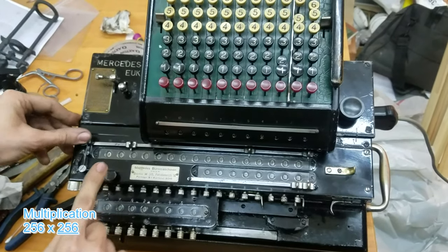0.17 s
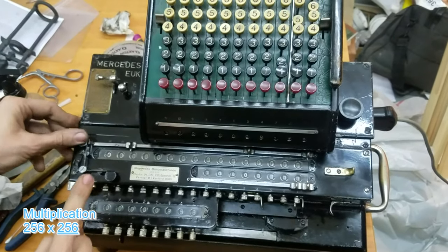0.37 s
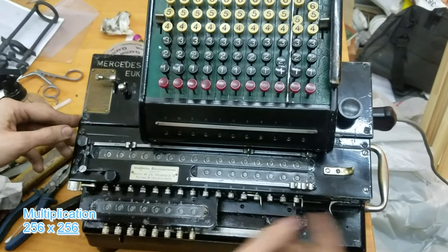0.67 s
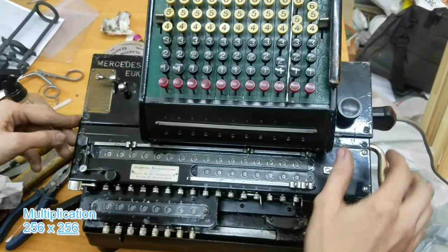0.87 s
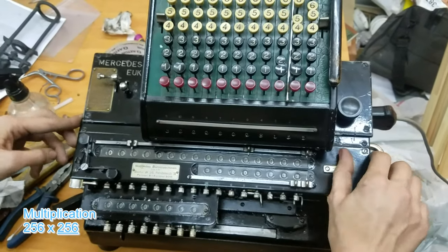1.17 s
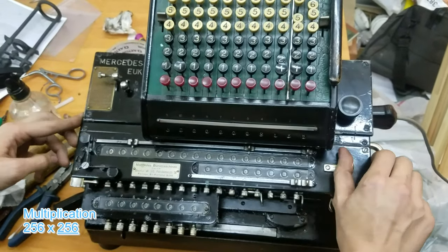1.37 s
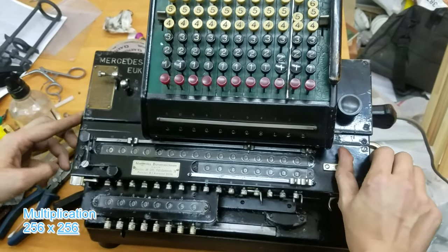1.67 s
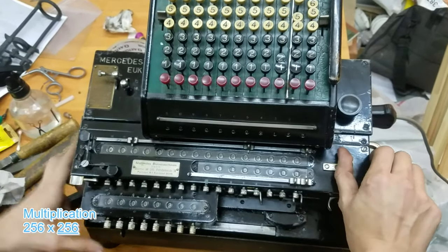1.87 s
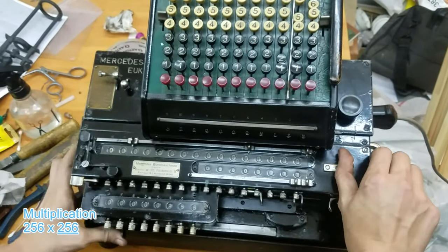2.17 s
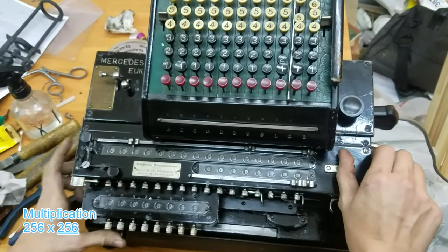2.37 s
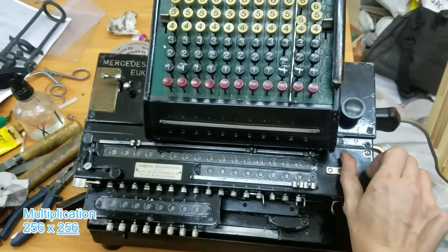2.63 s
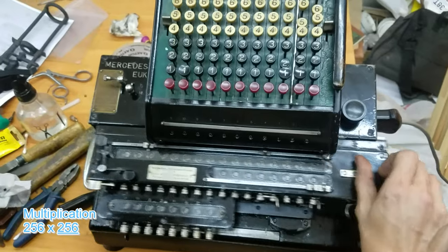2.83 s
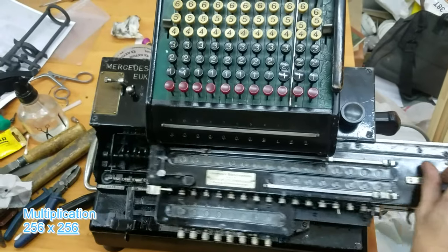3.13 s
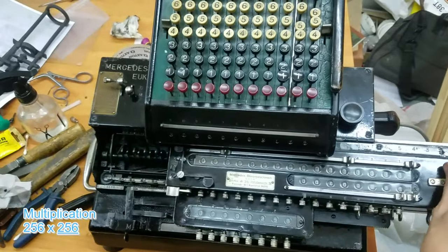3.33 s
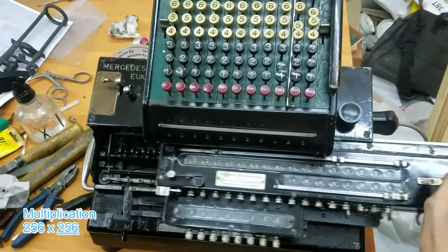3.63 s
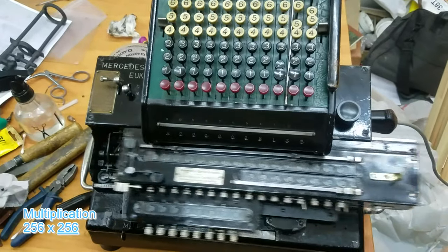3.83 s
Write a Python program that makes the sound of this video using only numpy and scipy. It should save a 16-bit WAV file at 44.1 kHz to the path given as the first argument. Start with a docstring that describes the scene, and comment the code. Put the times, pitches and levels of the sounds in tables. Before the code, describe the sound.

A mechanical calculator's carriage ratchets loudly along its rack, thuds, then rattles back and slams home.

```python
"""Light lever clicks and a hand brushing the case: an old mechanical calculator, close up in a small room.
A latch springs, the carriage is pulled along its rack with a pawl snapping over the teeth, and it thuds
into the end stop. Then it runs back with a growing rattle of gears and slams home.
Contacts are quickly dying noise, steel parts are fading sine tones, and sliding and brushing are
noise made uneven by tiny contacts. Dull room noise and a wavering hum lie underneath."""
import sys
import numpy as np
from scipy import signal
from scipy.fft import rfft, irfft, next_fast_len
from scipy.io import wavfile
from scipy.ndimage import uniform_filter1d, map_coordinates

SR = 44100
rng = np.random.default_rng(int(sys.argv[2]) if len(sys.argv) > 2 else 0)


def store_pcm(level_fs):
    """Save levels as 16-bit WAV."""
    pcm = np.round(np.clip(level_fs, -1, 1) * 32767).astype(np.int16)
    wavfile.write(sys.argv[1], SR, np.atleast_2d(pcm).T)


N = 176400  # samples, 4 s


# The pawl drops into the rack, one row a tooth: (time [s], level [dB])
PAWL_SNAPS = [(2.8, -12.5), (2.8295, -12), (2.832, -10.5), (2.852, -15.5), (2.8687, -14), (2.8833, -14),
              (2.8984, -17), (2.9107, -11), (2.9147, -10.5), (2.9235, -13), (2.9354, -15), (2.9458, -12.5),
              (2.957, -10.5), (2.9675, -12), (2.9778, -11), (2.9869, -11.5), (2.998, -10), (3.008, -13),
              (3.0184, -11.5), (3.03, -12.5), (3.043, -10), (3.05, -11), (3.0608, -12.5), (3.0719, -13.5),
              (3.0825, -13.5), (3.0948, -14), (3.1041, -13), (3.1076, -10), (3.118, -14), (3.1314, -13.5),
              (3.147, -16), (3.1619, -10), (3.1773, -13), (3.1946, -13.5), (3.2133, -15.5), (3.2356, -14),
              (3.26, -12.5), (3.2843, -11), (3.3059, -10.5), (3.3283, -14), (3.351, -11.5)]
# Tone colour of the snap: (frequency [Hz], level [dB])
PAWL_COLOUR = [(150, -17), (900, -9.5), (1600, 1.5), (2300, -4.5), (4500, -1), (7100, 2.5), (9000, -1),
               (12500, 1), (15500, 0.5)]
# Ringing tones of the pawl: (frequency [Hz], level [dB], time to fall 60 dB [s])
PAWL_MODES = [(1532, -6, 0.026), (4870, 2.5, 0.027), (6560, 0, 0.029)]
PAWL_DB, PAWL_RING_DB = 3.8, -13  # added to the level of each row
PAWL_T60, PAWL_RISE_S = 0.015, 0.0007
PAWL_SCATTER = 0.025  # each tooth rings a little higher or lower (share of the frequency)


def pawl():
    """Each tooth gives a sharp snap of noise and a short steel ring, fastest in the middle of the pull."""
    snaps, steel = np.zeros((2, 2, N))
    for s, db in PAWL_SNAPS:
        add(snaps, s, amp(db + PAWL_DB) * burst(PAWL_T60, PAWL_RISE_S))
        modes = []
        for hz, level, t60 in PAWL_MODES:
            modes.append((hz * (1 + PAWL_SCATTER * rng.standard_normal()), level, t60))
        add(steel, s, amp(db + PAWL_RING_DB) * ring(modes, size=3000))
    return tinted(coloured(snaps, PAWL_COLOUR) + steel)


# The sliding carriage: (time [s], rumble level [dB], rattle level [dB])
SLIDE = [(2.79, -50, -75), (2.83, -43, -56), (2.89, -37.5, -34), (2.92, -29.5, -30), (3.0, -33.5, -25.5),
         (3.11, -29.5, -30), (3.16, -37, -31), (3.22, -38, -38.5), (3.36, -41, -43.5), (3.5, -40.5, -52.5),
         (3.61, -42, -46), (3.64, -38.5, -36.5), (3.7, -38, -38.5), (3.74, -31, -30), (3.85, -30, -24),
         (3.95, -31.5, -24.5)]
# Tone colour of the rumble: (frequency [Hz], level [dB])
RUMBLE_COLOUR = [(25, -28), (70, -7.5), (105, -11), (135, 11.5), (190, -2), (380, -3), (520, -9),
                 (720, -4.5), (1000, -12), (2000, -29)]
# Ringing tones of the machine's frame, also used by stops(): (frequency [Hz], level [dB], 60 dB fall [s])
FRAME_MODES = [(135.1, 1.5, 0.41), (161.6, -2, 0.23), (230, -4.5, 0.43), (296.9, -2.5, 0.37),
               (356, -2.5, 0.22), (441.7, -4, 0.26), (691, -5, 0.33), (722, -5, 0.3)]
# Gears catch as the carriage runs back: (time [s], level [dB])
CATCHES = [(3.5322, -34), (3.6188, -35), (3.6284, -17.5), (3.6562, -28), (3.6833, -27), (3.7044, -17.5),
           (3.7264, -24), (3.7615, -17.5), (3.7684, -18.5), (3.8244, -11), (3.8803, -10), (3.908, -18.5),
           (3.9328, -10.5), (3.9569, -12)]
# Tone colour of the gear rattle: (frequency [Hz], level [dB])
GEAR_COLOUR = [(300, -27.5), (640, -2), (930, -7.5), (1450, 1), (2000, -5.5), (3000, -3.5), (5400, -5.5),
               (6800, -3), (9400, -10.5), (15500, -11.5)]
# Tone colour of the catches: (frequency [Hz], level [dB])
CATCH_COLOUR = [(300, -21), (1450, 1), (2500, -4), (5400, -1.5), (6700, 1), (9400, -4), (15500, -1)]
DRONE_DB = -8.5  # the frame rings along under the rumble
GRAINS_PER_S, RUB_SHARE = 800, 0.45
CATCH_DB, CATCH_T60, CATCH_RISE_S = -1, 0.049, 0.0018


def carriage():
    """Sliding rumbles through the frame while loose gears rattle and catch with brighter clicks."""
    rumble_db, rattle_db = gains(SLIDE)
    push = amp(rumble_db) * noise()
    drone = resonate(push, ring(FRAME_MODES))
    gears = amp(rattle_db) * friction(GRAINS_PER_S, RUB_SHARE)
    catches = np.zeros((2, N))
    for s, db in CATCHES:
        add(catches, s, amp(db + CATCH_DB) * burst(CATCH_T60, CATCH_RISE_S))
    rattle = tinted(coloured(gears, GEAR_COLOUR) + coloured(catches, CATCH_COLOUR))
    rumble = coloured(push, RUMBLE_COLOUR)
    return rumble + amp(DRONE_DB) * drone + rods(rattle)


# The carriage strikes its stops and rebounds: (time [s], thud level [dB], crack level [dB])
STOP_BLOWS = [(3.3724, -30, -12.5), (3.378, -12, -27), (3.389, -24, -24), (3.533, -35, -46),
              (3.9608, -20.5, -10.5), (3.967, -13.5, -16), (3.978, -21.5, -16.5)]
# Tone colour of the thud: (frequency [Hz], level [dB])
THUD_COLOUR = [(40, -27), (110, -11), (230, -2.5), (350, 1.5), (520, -12), (715, 0.5), (950, -15),
               (1150, -6), (2000, -20), (5000, -36)]
# Tone colour of the crack: (frequency [Hz], level [dB])
CRACK_COLOUR = [(400, -8.5), (1300, -10.5), (2200, -1.5), (7000, -3.5), (15500, -8.5)]
# Ringing tones of the steel stop: (frequency [Hz], level [dB], time to fall 60 dB [s])
CLANK_MODES = [(2863, 1, 0.046), (1284, -6, 0.074)]
THUD_T60, CRACK_T60 = 0.1, 0.054  # seconds
FRAME_DB = -14  # frame ring, relative to the row's thud level
CLANK_S, CLANK_DB = 3.9605, -11  # a steel stop takes the returning carriage


def stops():
    """Steel cracks against steel, the whole machine thuds and its frame rings on."""
    thud, crack, frame = np.zeros((3, 2, N))
    for s, thud_db, crack_db in STOP_BLOWS:
        add(thud, s, amp(thud_db) * burst(THUD_T60, rise_s=0.00069))
        add(crack, s, amp(crack_db) * burst(CRACK_T60, rise_s=0.0011))
        add(frame, s, amp(thud_db + FRAME_DB) * ring(FRAME_MODES))
    add(frame, CLANK_S, amp(CLANK_DB) * ring(CLANK_MODES))
    return coloured(thud, THUD_COLOUR) + rods(coloured(crack, CRACK_COLOUR)) + frame


RODS_LOW_HZ, RODS_HIGH_HZ = 902, 7200
RODS_DB, RODS_T60 = -12.5, 0.035


def rods(x, count=110):
    """Many small rods and springs ring in sympathy, giving the sound a metallic grain."""
    modes = [(hz, 0, RODS_T60) for hz in rng.uniform(RODS_LOW_HZ, RODS_HIGH_HZ, count)]
    return x + amp(RODS_DB) * resonate(x, ring(modes, size=5000))


# Small levers and keys: (time [s], level [dB], time to fall 60 dB [s], body level [dB], treble level [dB])
LEVER_CLICKS = [(0.055, -36.5, 0.021, -3, 6.5), (0.1925, -34, 0.038, 2, -6), (0.1988, -20.5, 0.018, -4, -2),
                (.208, -29, .03, -2, 1), (0.2126, -22, 0.031, 4.5, -15), (0.3947, -28.5, 0.032, 3, -10),
                (.602, -48.5, 0.068, 3, -4), (.803, -40, .045, -10, -6), (1.378, -47, 0.015, -10, 18.5),
                (1.67, -43.5, 0.085, -8, 0)]
# Tone colour of the clicks: (frequency [Hz], level [dB])
LEVER_COLOUR = [(60, -30), (120, -15), (320, 9.5), (530, -2.5), (1000, -3), (1760, 3.5), (3000, -4.5),
                (4500, -3), (7000, -3), (15500, -0.5)]


def band(x, hz, kind):
    """Keep only the low, middle or high part of a sound."""
    return signal.sosfilt(signal.butter(3, hz, kind, fs=SR, output='sos'), x)


def levers():
    """Light contacts click, each with its own share of body and treble."""
    body, middle, treble = np.zeros((3, 2, N))
    for s, db, t60, body_db, treble_db in LEVER_CLICKS:
        click = amp(db) * burst(t60)
        add(middle, s, click)
        add(body, s, amp(body_db) * click)
        add(treble, s, amp(treble_db) * click)
    low_hz, high_hz = 1500, 7800
    low = band(body, low_hz, 'low')
    mid = band(middle, [low_hz, high_hz], 'band')
    high = band(treble, high_hz, 'high')
    # the middle band is turned upside down in the mix
    return coloured(low - mid + high, LEVER_COLOUR)


# Ringing tones of the latch spring: (frequency [Hz], level [dB], time to fall 60 dB [s])
LATCH_MODES = [(1965, -3, .14), (2067, -4, 0.054), (3930, -8.5, .15), (6890, -10, 0.13)]
# Tone colour of the scrape: (frequency [Hz], level [dB])
LATCH_COLOUR = [(300, -4), (1500, -2), (7500, 2), (15500, 5)]
LATCH_S, LATCH_DB, LATCH_T60, LATCH_RISE_S = 2.266, -29.5, 0.096, 0.0059  # a sprung latch is released
LATCH_TAIL_DB, LATCH_TAIL_T60 = -45.5, 0.51  # the spring shivers on
LATCH_RING_DB = -35.5
LATCH_BLUR = 0.54  # the loose spring's ring is unsteady (radians)


def latch():
    """A short scrape sets a spring ringing and shivering."""
    scrape, spring = np.zeros((2, 2, N))
    rub = amp(LATCH_DB) * burst(LATCH_T60, LATCH_RISE_S)
    shiver = amp(LATCH_TAIL_DB) * burst(LATCH_TAIL_T60, LATCH_RISE_S)
    add(scrape, LATCH_S, rub + shiver)
    add(spring, LATCH_S, amp(LATCH_RING_DB) * ring(LATCH_MODES, rise_s=0.0033))
    scrape = tinted(coloured(scrape, LATCH_COLOUR))
    # a random curve pushes the phase of the ring to and fro
    unsteady = np.real(signal.hilbert(spring) * np.exp(1j * LATCH_BLUR * wobble(200)))
    return scrape + unsteady


# A hand on the case: (time [s], level [dB])
BRUSH_LEVEL = [(.645, -70), (.7, -52), (.81, -45), (.87, -55.5), (1.1, -69.5)]
# Tone colour of the brushing: (frequency [Hz], level [dB])
BRUSH_COLOUR = [(150, 5), (2000, -1.5), (7200, 0), (8200, -9), (15500, -5)]
BRUSH_GRIPS_PER_S, BRUSH_RUB = 170, 1.9  # the skin catches now and then amid its steady rub


def brush():
    """Skin slides over the case, gripping and slipping."""
    level_db, = gains(BRUSH_LEVEL)
    return coloured(amp(level_db) * friction(BRUSH_GRIPS_PER_S, BRUSH_RUB), BRUSH_COLOUR)


# How long the room rings: (frequency [Hz], time to fall 60 dB [s])
ROOM_T60 = [(150, 0.41), (2000, 0.47), (6000, 0.34), (14000, 0.15)]
ROOM_DB = -13


def room(x):
    """The small room answers with a short tail of fading noise whose treble dies first."""
    hz, t, z = signal.stft(rng.standard_normal((2, SR // 2)), SR, nperseg=256)
    fade = amp(-60 * t / along(ROOM_T60, hz)[:, None])
    tail = signal.istft(z * fade, SR, nperseg=256)[1]
    return resonate(x, tail)


# Tone colour of the room noise: (frequency [Hz], level [dB])
AIR_COLOUR = [(25, -28.5), (60, -8.5), (110, -9), (140, -5), (220, -12), (290, -11), (400, -14.5),
              (1110, -18.5), (2400, -28.5), (4500, -40.5), (7000, -37.5), (9800, -35.5), (15500, -29)]
# Wavering room hum: (frequency [Hz], level [dB])
HUM_TONES = [(68, -67), (138, -64), (198, -58), (291, -65)]
# How much louder the left is than the right: (frequency [Hz], left over right [dB])
AIR_BALANCE = [(60, 1), (180, 5.5), (550, 10.5), (1650, 10.5), (12000, -1.5)]
AIR_DB = -53.5


def air():
    """Dull room noise with a hum of tones that drift in strength and phase."""
    t = np.arange(N) / SR
    hum = 0
    for hz, db in HUM_TONES:
        drift = wobble(9) + 1j * wobble(9)
        hum = hum + amp(db) * unit(np.real(drift * np.exp(2j * np.pi * hz * t)))
    hiss = amp(AIR_DB) * coloured(noise(), AIR_COLOUR)
    return placed(hiss + hum * np.array([[1], [0]]), AIR_BALANCE)


# How alike the two sides are: (frequency [Hz], likeness [0 to 1])
ALIKE = [(60, 0.72), (150, 0.94), (400, 0.74), (1400, 0.26), (5000, 0.28)]
RIGHT_LAG_S, LAG_FADE_HZ = 0.00053, 400  # the bass reaches the right side a little later


def placed(pair, balance):
    """Two unrelated signals become left and right, with likeness, loudness and lag set by frequency."""
    m = next_fast_len(N + SR // 4)
    hz = np.fft.rfftfreq(m, 1 / SR)
    a, b = rfft(pair, m)
    alike = np.clip(along(ALIKE, hz), 0, 1)
    lean = amp(-along(balance, hz))
    lag_s = RIGHT_LAG_S * np.exp(-hz / LAG_FADE_HZ)
    mixed = alike * a + np.sqrt(1 - alike ** 2) * b
    right = lean * mixed * np.exp(-2j * np.pi * hz * lag_s)
    # the last factor keeps the total power of the two sides
    return irfft(np.array([a, right]) * np.sqrt(2 / (1 + lean ** 2)), m)[:, :N]


def burst(t60, rise_s=0.00045):
    """The crowded, quickly dying ring of one contact, made of fading noise."""
    t = np.arange(SR // 4) / SR
    return rng.standard_normal((2, len(t))) * amp(-60 * t / t60) * (1 - np.exp(-t / rise_s))


def ring(modes, rise_s=0.00068, size=22050):
    """A struck part rings in fading sine tones, a little different at every blow."""
    t = np.arange(size) / SR
    hz, db, t60 = np.transpose(modes)[:, :, None]
    level = amp(db + 2 * rng.standard_normal(hz.shape) - 60 * t / t60)
    tones = level * np.sin(2 * np.pi * (hz * t + rng.random((2, len(hz), 1))))
    return tones.sum(1) * (1 - np.exp(-t / rise_s))


GRAIN_S, GRAIN_SPREAD_DB = 0.00075, 3.2  # fading time and uneven size of tiny contacts


def friction(rate, rub):
    """Noise of rms near 1: tiny contacts of uneven size, rate a second, over a steady rub."""
    ticks = (rng.random(N) < rate / SR) * amp(GRAIN_SPREAD_DB * rng.standard_normal(N))
    power = signal.lfilter([1], [1, -np.exp(-1 / (SR * GRAIN_S))], ticks ** 2)
    contact = np.sqrt(power)
    return unit(unit(contact) + rub) * noise()


TINT_DB = 2.4  # no two contacts have quite the same colour


def strength(v):
    """Size of each short slice of sound, over all its frequencies."""
    return np.linalg.norm(v, axis=1, keepdims=True) + 1e-20


def tinted(x, size=256):
    """Contacts favour other resonances but keep their strength: random gain, patches about 700 Hz by 12 ms."""
    z = signal.stft(x, nperseg=size)[2]
    field = uniform_filter1d(rng.standard_normal(z.shape[1:]), size=4, axis=0)
    field = uniform_filter1d(field, size=4, axis=1)
    patchy = z * amp(TINT_DB * unit(field))
    return signal.istft(patchy * strength(z) / strength(patchy), nperseg=size)[1][:, :N]


def resonate(x, response):
    """Every moment of x sets off the response, scaled to unit energy on its first side."""
    return signal.fftconvolve(x, response / np.linalg.norm(response[0]), axes=1)[:, :N]


def coloured(x, points, size=8192):
    """Filter to a (Hz, dB) colour that keeps the power of white noise and never sounds early."""
    shape = unit(amp(along(points, np.fft.rfftfreq(size, 1 / SR))))
    # folding the cepstrum puts all of the filter after time zero
    cepstrum = irfft(np.log(shape + 1e-6))
    cepstrum[1:size // 2] *= 2
    cepstrum[size // 2 + 1:] = 0
    response = irfft(np.exp(rfft(cepstrum)))[None, :size // 2]
    return signal.oaconvolve(x, response, axes=1)[:, :N]


def amp(db):
    """Decibels to gain."""
    return np.exp(np.asarray(db) * (np.log(10) / 20))


def unit(x):
    """Scale to rms 1."""
    return x / np.sqrt(np.mean(x ** 2) + 1e-20)


def along(points, hz):
    """Read (Hz, value) points on a log axis."""
    f, v = np.transpose(points)
    return np.interp(np.log(hz + 1), np.log(f + 1), v)


def gains(rows):
    """One dB level per sample for each column, silent before the first row and held after the last."""
    s, *cols = np.transpose(rows)
    return [np.interp(np.arange(N) / SR, s, c, left=-np.inf) for c in cols]


def wobble(rate):
    """A smooth random curve, rate knots a second."""
    knots = rng.standard_normal(int(N * rate / SR) + 4)
    return map_coordinates(knots, [np.arange(N) * rate / SR])


def noise():
    """Two unrelated white noises."""
    return rng.standard_normal((2, N))


def add(track, s, sound):
    """Mix a sound in at time s, cut off at the end of the track."""
    part = track[:, max(round(s * SR), 0):][:, :sound.shape[1]]
    part += sound[:, :part.shape[1]]


# How much louder the machine is on the left: (frequency [Hz], left over right [dB])
NEAR_BALANCE = [(100, 5), (240, 6.5), (480, 13.5), (2200, 13), (4500, 20), (7300, 30.5), (9500, 14),
                (15000, 0)]


def scene():
    """The machine, towards the left, in its room."""
    machine = levers() + latch() + pawl() + carriage() + stops() + brush()
    return placed(machine + amp(ROOM_DB) * room(machine), NEAR_BALANCE) + air()


SHELF_HZ, SHELF_DB = 7710, -11  # the top octave is duller
TOP_HZ, TOP_EDGE_HZ = 15850, 90  # upper limit and how gradual it is


def record(dry):
    """The top octave steps down and the sound fades out steeply around the upper limit."""
    m = next_fast_len(N + SR // 4)
    hz = np.fft.rfftfreq(m, 1 / SR)
    shelf = amp(SHELF_DB * (1 + np.tanh((hz - SHELF_HZ) / 280)) / 2)
    limit = (1 - np.tanh((hz - TOP_HZ) / TOP_EDGE_HZ)) / 2
    return irfft(rfft(dry, m) * shelf * limit, m)[:, :N]


dry = scene()
out = record(dry)
store_pcm(out)
```